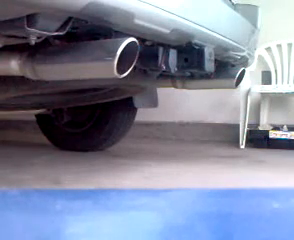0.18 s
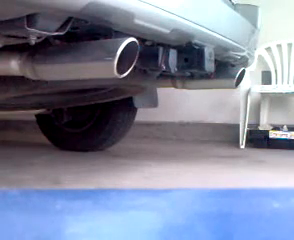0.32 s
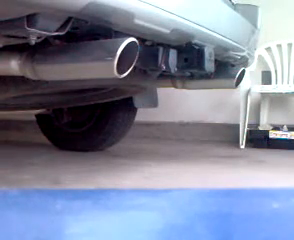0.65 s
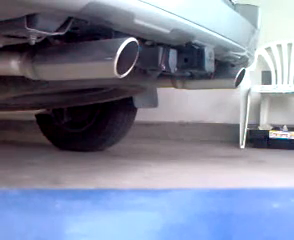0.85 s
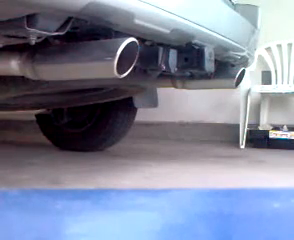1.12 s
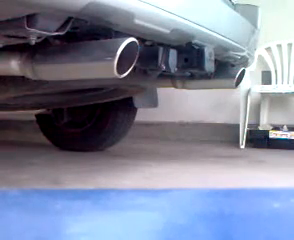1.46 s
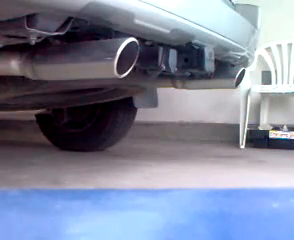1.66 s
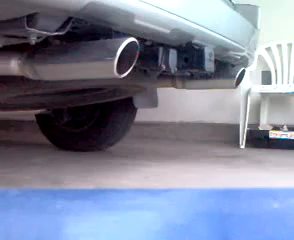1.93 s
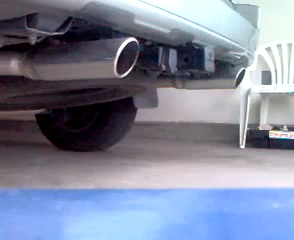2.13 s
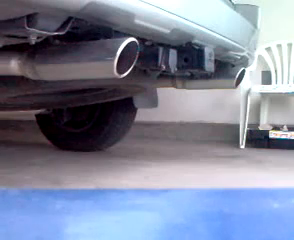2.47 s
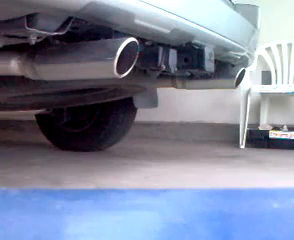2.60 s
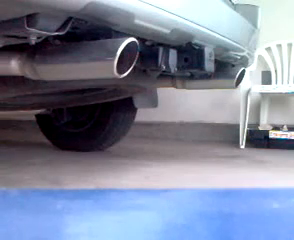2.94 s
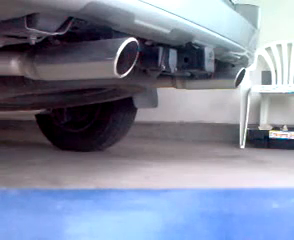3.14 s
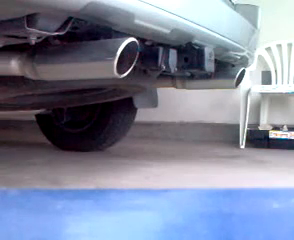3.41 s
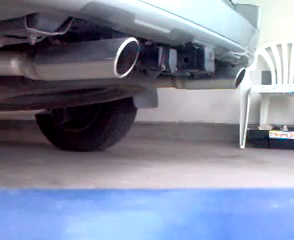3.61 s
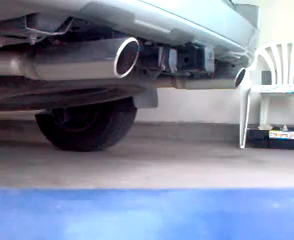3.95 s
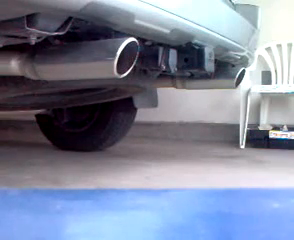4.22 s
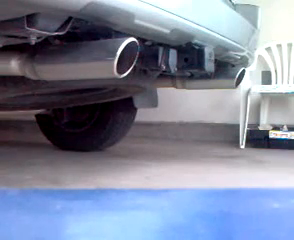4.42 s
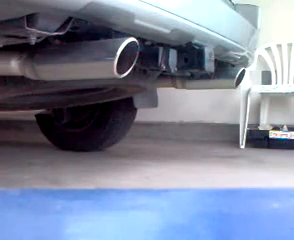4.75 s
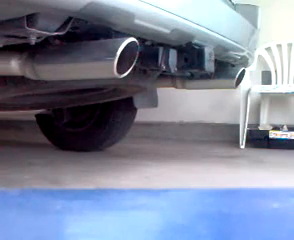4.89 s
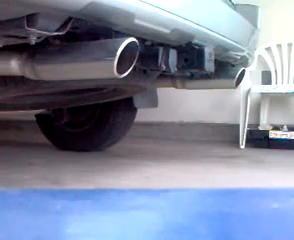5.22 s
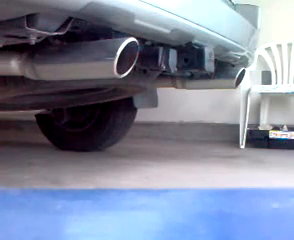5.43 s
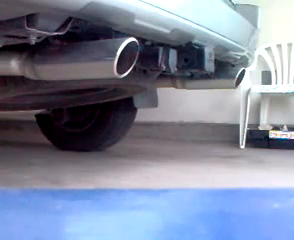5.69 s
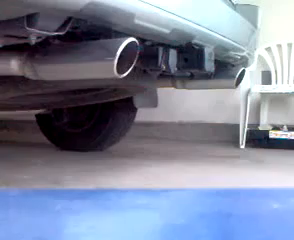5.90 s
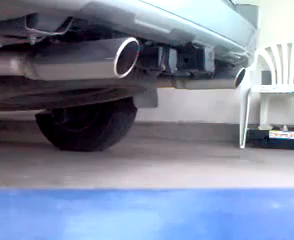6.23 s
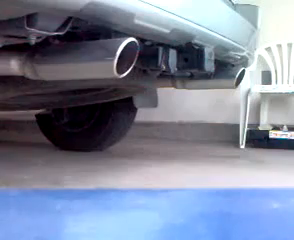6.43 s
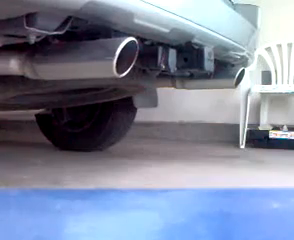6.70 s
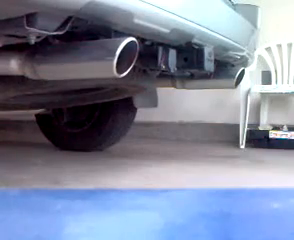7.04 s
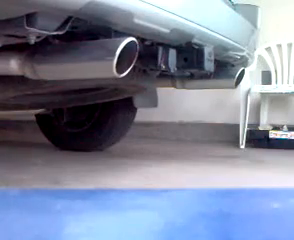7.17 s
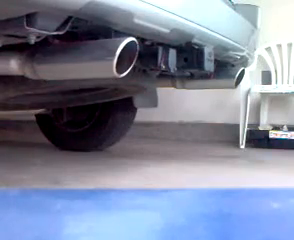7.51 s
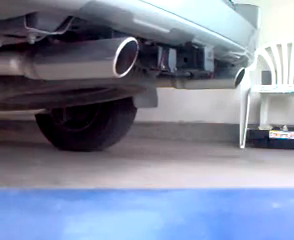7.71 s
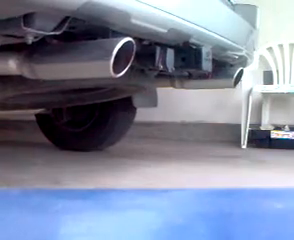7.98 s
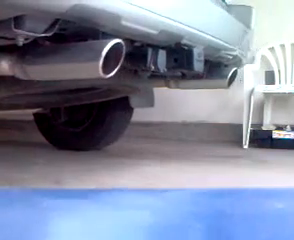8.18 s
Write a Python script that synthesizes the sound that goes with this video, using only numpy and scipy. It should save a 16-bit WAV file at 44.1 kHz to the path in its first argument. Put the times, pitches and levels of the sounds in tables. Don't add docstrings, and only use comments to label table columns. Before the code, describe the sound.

A heavy engine rumbles from an exhaust pipe very close by. It begins with revs running down, gets a single brief roaring blip with a gulp of intake air, hums low as the throttle shuts, and returns to a lumpy idle with a steady mechanical rush. Late on there is a hard metallic clunk, lighter knocks and a hiss, then slow, strong laboured pulses in gear. Mono, with limited treble and mild overload.

```python
import sys
import numpy as np
from scipy import signal
from scipy.fft import rfft, irfft, next_fast_len
from scipy.io import wavfile
from scipy.ndimage import uniform_filter1d, map_coordinates

SR = 44100
rng = np.random.default_rng(int(sys.argv[2]) if len(sys.argv) > 2 else 0)


def volts_from_decibels(level):
    exponent = np.asarray(level, float) / 20
    return 10 ** exponent


def wrap_up_sound(samples):
    columns = np.atleast_2d(samples).T
    tamed = np.clip(columns, -1, 1)
    steps = np.round(tamed * 32767).astype(np.int16)
    wavfile.write(sys.argv[1], SR, steps)


N = 368235

# t/s, level/dB
GAS = [(0, -16.5), (.1, -20), (.55, -27.5), (1.05, -34), (1.56, -38), (2.06, -38), (2.2, -28), (2.32, -27),
       (3.1, -28), (4, -30.5), (5.9, -32.5), (6.3, -30), (7, -34.5), (7.3, -32.5), (8.35, -34.5)]
MEAN_GAS_DB = -32


def unit(x):
    return x / np.sqrt(np.mean(x ** 2) + 1e-20)


def curves(rows):
    s, *cols = np.transpose(rows)
    return [np.interp(np.arange(N) / SR, s, c) for c in cols]


def wobble(rate):
    points = rng.standard_normal(int(N * rate / SR) + 4)
    return map_coordinates(points, [np.arange(N) * rate / SR])


def swells(rows):
    t = np.arange(N) / SR
    gain = np.zeros(N)
    for s, db, rise, fall in rows:
        distance = (t - s) / np.where(t < s, rise, fall)
        gain += volts_from_decibels(db - 10 * distance ** 2)
    return gain


def filtered(x, response):
    m, lead = next_fast_len(N + SR // 2), SR // 8
    ring = np.r_[x, np.zeros(m - N - lead), x[lead:0:-1]]
    return irfft(rfft(ring) * response(np.fft.rfftfreq(m, 1 / SR)), m)[:N]


def resonances(modes, f):
    total = 0
    for k, (c, w, db) in enumerate(modes):
        total = total + (-1) ** k * volts_from_decibels(db) * 1j * f * w / (c * c - f * f + 1j * f * w)
    return total


def ringing_noise(modes):
    return unit(filtered(rng.standard_normal(N), lambda f: resonances(modes, f) * (f < 7700)))


def rush(spectrum, patchy_db):
    # f/Hz, width/Hz, lift/dB
    panels = [(456, 30, 4), (982, 50, 4), (1200, 60, 3), (1466, 30, 3), (2454, 80, 3), (2905, 90, 2),
              (3254, 45, 3), (3573, 45, 3), (4561, 70, 6), (5910, 50, 3)]
    z = signal.stft(rng.standard_normal(N + 512), nperseg=512)[2]
    field = uniform_filter1d(uniform_filter1d(rng.standard_normal(z.shape), 6, 0), 14, 1)
    noise = signal.istft(z * volts_from_decibels(patchy_db * unit(field)), nperseg=512)[1][:N]
    hz, db = np.transpose(spectrum)
    grid = np.arange(0, SR / 2, 4.)
    lift_db = sum(level / (1 + (2 * (grid - c) / w) ** 2) for c, w, level in panels)
    gain = volts_from_decibels(np.interp(np.log(grid + 1), np.log(hz + 1), db) + lift_db)
    return unit(filtered(noise, lambda f: np.interp(f, grid, gain)))


def speed():
    # t/s, f/Hz
    cycle_rate = [(0, 31.9), (.1, 28.7), (.78, 15.2), (1.02, 11.9), (1.35, 10.65), (2.03, 9.8),
                  (2.28, 19.2), (2.44, 21.7), (3.0, 13.1), (3.4, 10.8), (3.8, 9.98), (5.6, 9.48),
                  (6.44, 8.9), (6.61, 6.5), (6.8, 6.22), (7.0, 6.9), (7.3, 7.12), (8.35, 6.8)]
    flywheel_s = .06
    return uniform_filter1d(curves(cycle_rate)[0], int(flywheel_s * SR), mode="nearest")


def fan():
    return np.clip((np.arange(N) / SR - 2.3) / .03, 0, 1)


def panel_whine():
    # t/s, level/dB, rise/s, fall/s
    whine = [
        (.33, -38.5, .2, 0.22),
        (2.58, -34, 0.14, .1),
        (3.7, -46, 0.43, 0.58),
    ]
    rest_db = -58.5
    phase = 2 * np.pi * np.cumsum(1200 + 22 * wobble(60)) / SR
    return np.sqrt(2) * (swells(whine) + volts_from_decibels(rest_db)) * volts_from_decibels(2.5 * wobble(15)) * np.sin(phase)


def machinery(firings):
    # f/Hz, level/dB per Hz
    flow_colour = [(180, -53.5), (300, -4.5), (337, -4), (404, -14.5), (540, -13.5), (707, -14.5),
                   (1220, -17.5), (1350, -21.5), (1560, -18), (3000, -31.5), (3900, -44.5), (6600, -120)]
    # f/Hz, level/dB per Hz
    machine_colour = [(820, -35), (1400, -9), (1570, -15.5), (2080, -4.5), (2210, -3), (2480, -3.5),
                      (2690, -4), (4260, -6), (4500, -8), (4970, -11), (6050, -12), (7270, -16.5),
                      (7530, -23.5), (9790, -56), (16600, -120)]
    flow_db, = curves(GAS)
    machine_db = -39 + 0.85 * (flow_db - MEAN_GAS_DB) + 3.5 * fan()
    beat = np.cos(2 * np.pi * firings)
    shared = wobble(22.0)
    flow = volts_from_decibels(flow_db + .3 * shared + .6 * beat) * rush(flow_colour, patchy_db=.6)
    gear_gain = volts_from_decibels(machine_db + .3 * shared + .5 * beat + .4 * wobble(60))
    return flow + gear_gain * rush(machine_colour, patchy_db=.5)


def intake():
    # t/s, level/dB, rise/s, fall/s
    gulp = [
        (2.09, -38, 0.035, 0.15),
        (2.5, -42.5, 0.11, 0.24),
        (6.06, -41.5, .05, .05),
        (6.43, -38.5, .05, .09),
    ]
    # f/Hz, width/Hz, level/dB
    gulp_tone = [(3200, 3500, 0)]
    # t/s, level/dB, rise/s, fall/s
    whoosh = [
        (2.3, -32.5, 0.05, 0.065),
    ]
    # f/Hz, width/Hz, level/dB
    whoosh_tone = [(2130, 330, 0)]
    return swells(gulp) * ringing_noise(gulp_tone) + swells(whoosh) * ringing_noise(whoosh_tone)


def linkage():
    # t/s, knock level/dB, hiss level/dB, hold/s, time to fall 60 dB/s
    shift = [
        (6.037, -46.5, -52.5, 0.19, 0.098),
        (6.108, -24.5, -46, 0.035, 0.25),
        (6.394, -39, -43.5, 0.1, 0.15),
        (6.746, -33.5, -33, 0.053, 0.55),
        (7.335, -33.5, -41.5, .06, 0.26),
    ]
    # f/Hz, width/Hz, level/dB
    knock = [(537, 37, -11.5), (670, 420, -6.5), (947, 72, -3), (1127, 350, -11.5)]
    squeak = [(1310, 130, 0), (1500, 160, 0), (1650, 100, -4)]
    hiss = [(3000, 400, -4), (4400, 900, -9), (5540, 300, 1), (6500, 250, -4), (7000, 200, -7),
            (7350, 250, -6)]
    squeak_db = -1
    strike, strike_s = 0.23, 0.011
    t = np.arange(N) / SR
    levels = np.zeros((3, N))
    for s, knock_db, hiss_db, hold, t60 in shift:
        since = np.maximum(t - s, 0)
        onset = np.clip(since / 0.004, 0, 1)
        decay = volts_from_decibels(-60 * np.maximum(since - hold, 0) / t60)
        shape = onset * decay * (1 + strike * np.exp(-since / strike_s))
        levels += volts_from_decibels(np.array([knock_db, hiss_db + squeak_db, hiss_db]))[:, None] * shape
    sound = np.zeros(N)
    for level, modes in zip(levels, (knock, squeak, hiss)):
        sound += level * volts_from_decibels(1.0 * wobble(90)) * ringing_noise(modes)
    return sound


def boom():
    # t/s, level/dB, rise/s, fall/s
    hum = [
        (2.79, -15, 0.11, 0.24),
    ]
    boom_hz = 56.9
    tone = np.sin(2 * np.pi * boom_hz * np.arange(N) / SR)
    return np.sqrt(2) * swells(hum) * volts_from_decibels(1.2 * wobble(19)) * tone


def bark(firings, fall_db=-8.0):
    # t/s, level/dB, rise/s, fall/s
    snaps = [
        (2.18, -8, 0.066, 0.026),
        (2.25, -28, 0.025, 0.045),
    ]
    overtones = sum(volts_from_decibels(fall_db * k) * np.cos(2 * np.pi * (k + 2) * firings) for k in range(6))
    return swells(snaps) * overtones


def imbalances(in_gear):
    # t/s, level/dB
    charge = [(0, -28), (.2, -33), (.4, -42.5), (.85, -29), (1.4, -33), (2.0, -33.5), (2.1, -22.5),
              (2.24, -17.5), (2.5, -39), (2.7, -24.5), (2.9, -20), (3.2, -27.5), (3.8, -25.5), (6, -28.5),
              (6.5, -15.5), (7.03, -6.5), (7.2, -11.5), (8.35, -7.5)]
    # t/s, bank level/dB, cylinder level/dB, half width/s
    upsets = [
        (2.54, -14, -1, 0.11),
        (2.72, 3.5, 8.5, 0.12),
        (3.09, 6, -1.5, 0.11),
        (6.25, 1.5, 0, 0.23),
        (6.68, -9.5, -4.5, 0.22),
    ]
    overrun_hz_per_s, shut_lead_s = 9.2, 0.12
    recover_s = 0.85
    t = np.arange(N) / SR
    gas_db = curves(GAS)[0] - MEAN_GAS_DB
    slowing = -np.gradient(speed()) * SR
    falling = np.clip((slowing - overrun_hz_per_s) / 5, 0, 1) * (speed() > 11)
    shut = uniform_filter1d(np.maximum(falling, np.interp(t + shut_lead_s, t, falling)), SR // 20)
    keep = np.exp(-1 / (recover_s * SR))
    overrun = np.maximum(shut, signal.lfilter([1 - keep], [1, -keep], shut))
    upset_db = sum(np.c_[db] * np.exp(-((t - s) / width) ** 2) for s, *db, width in upsets)
    bank_db = -19 + 1.026 * gas_db - 13 * overrun - 2.5 * in_gear + 1 * fan()
    uneven_db = -29.5 + 0.98 * gas_db
    return charge(0) if callable(charge) else curves(charge)[0], bank_db + upset_db[0], uneven_db + upset_db[1]


def exhaust(firings, turbulence_db=-27, edge_hz=390):
    bank = [1, -1, 1, 1, -1, 1, -1, -1]
    uneven = [1, .3, -.9, .2, .7, -.3, -.8, -.2]
    # f/Hz, width/Hz, level/dB
    pipe = [(35.6, 1.7, -16.2), (56.3, 7.4, -9.4), (50.9, 35.2, -18.3), (107.3, 7.0, 0.0),
            (135.0, 5.8, -8.8), (145.2, 19.0, -12.1), (216.6, 89.4, -14.3), (242.8, 9.5, -7.7),
            (265.7, 10.5, -12.3), (322.2, 47.2, -10.6), (367.6, 77.6, -13.5)]
    # revving level/dB, idling level/dB, in-gear level/dB
    orders = [(-3.5, -2.5, 3.5), (4.5, 8, 5), (3.5, 5.5, 8), (8, -0.5, -.1), (16.5, -3.5, 10.5),
              (10, 19, 1.5), (9, -2, 0), (22, 19, 7), (11, -6, 8.5), (6.5, 7, 9.5), (7, -1, -2), (3, 6, 2),
              (10.5, 3.6, 10), (-1.5, 4.5, -2), (3.5, -5, -6), (8, 11, 3), (0, -13.5, -5.5), (-7.5, 3, 7.5),
              (5, -0.1, 2.5), (1.5, 1.5, 0.2), (2, -2.5, 13), (-3, 3.5, -2), (-3, -7.5, -1.5),
              (-7, 7, -3.5), (1.5, -13.5, 4.5), (4, -7, -2.5), (0.5, -6.5, -6), (-1.5, -9, -7),
              (-5.5, -5, 6), (-6, -0.7, 2.5)]
    high_order_db = [-4.5, -9, -2.5]
    high_fall_db = [1.3, -0.4, 0.04]
    high_firing_db = [0, 4.5, -9.5]

    higher = np.arange(10)
    order = 1 + np.arange(len(orders) + len(higher))
    high_db = np.c_[high_order_db] + np.outer(high_fall_db, higher)
    high_db = high_db + np.outer(high_firing_db, higher % 8 == 1)
    state_db = np.c_[np.transpose(orders), high_db]

    cylinder = order % 8
    family = np.where(cylinder == 0, 0, np.where(cylinder % 2, 1, 2))
    pattern = np.where(family[:, None] == 1, bank, uneven)
    phase = np.angle(np.fft.fft(pattern)[np.arange(len(order)), cylinder])
    phase[family == 0] = 0
    angle = np.linspace(0, 1, 2049)
    waves = np.sqrt(2) * np.cos(2 * np.pi * np.outer(order, angle) + phase[:, None])

    revving = np.clip((speed() - 11.4) / 2.6, 0, 1)
    in_gear = np.clip((np.arange(N) / SR - 6.45) / .15, 0, 1)
    crank = (firings / 8 + .0008 * wobble(20)) % 1
    step = (crank * (len(angle) - 1)).astype(int)
    loads = imbalances(in_gear)
    drift_db = [.8 * wobble(5), 1.7 * wobble(5), 1.8 * wobble(6)]
    pressure = np.zeros(N)
    for k, load_db in enumerate(loads):
        rev, idle, gear = (volts_from_decibels(db[family == k]) @ waves[family == k] for db in state_db)
        wave = revving * rev[step] + (1 - revving - in_gear) * idle[step] + in_gear * gear[step]
        pressure += volts_from_decibels(load_db + 1 + drift_db[k]) * wave
    burn = volts_from_decibels(.5 * wobble(25))
    gas = volts_from_decibels(loads[2] + turbulence_db) * np.sqrt(SR / 2) * rng.standard_normal(N)

    def pipe_and_silencer(f):
        soft = 1 / (1 - (f / edge_hz) ** 2 + 1.2j * f / edge_hz)
        return resonances(pipe, f) * soft

    return filtered(burn * pressure + gas, pipe_and_silencer)


def scene():
    firings = np.cumsum(8 * speed()) / SR
    engine = exhaust(firings) + boom() + bark(firings) + machinery(firings) + panel_whine()
    return (engine + linkage() + intake())[None]


def roll_off(x):
    return signal.sosfilt(signal.butter(12, 7680, fs=SR, output="sos"), x)


def record(dry):
    duck_level, duck_s, duck_power = .7, 0.09, 0.097
    power = np.abs(uniform_filter1d(dry ** 2, int(duck_s * SR)))
    held = dry / (2 + (power / duck_level ** 2) ** 2) ** duck_power
    bent = held + .05 * (held ** 2 - uniform_filter1d(held ** 2, 2000))
    saturated = bent / (1 + np.abs(bent / .96) ** 6) ** (1 / 6)
    return roll_off(saturated)


dry = scene()
out = record(dry)
wrap_up_sound(out)
```